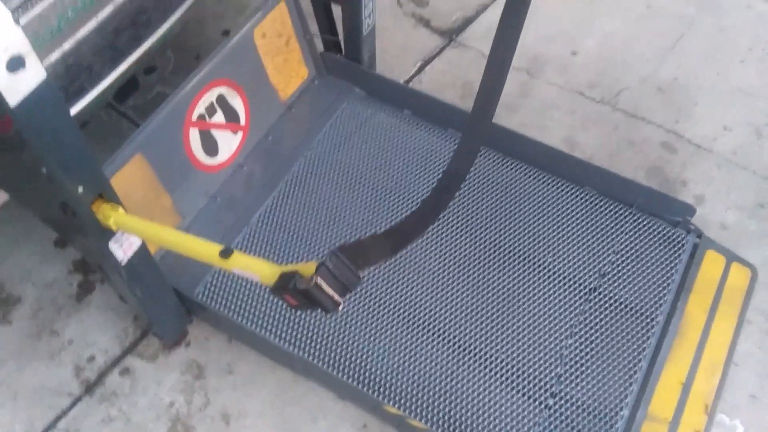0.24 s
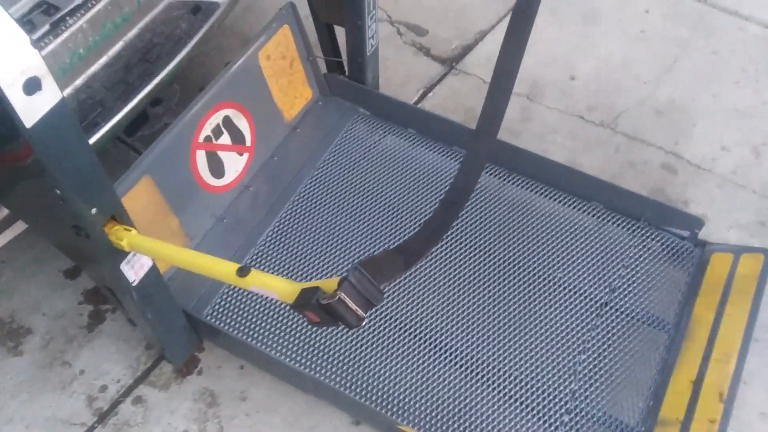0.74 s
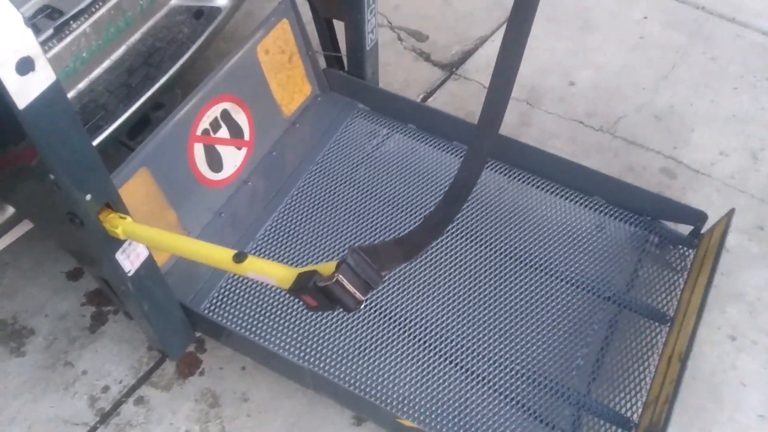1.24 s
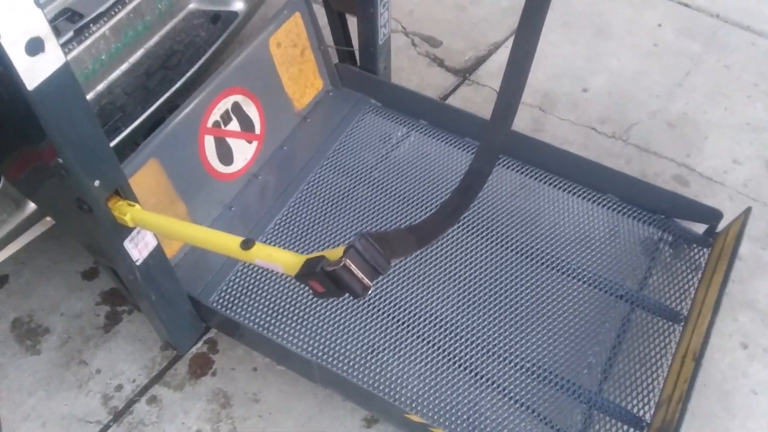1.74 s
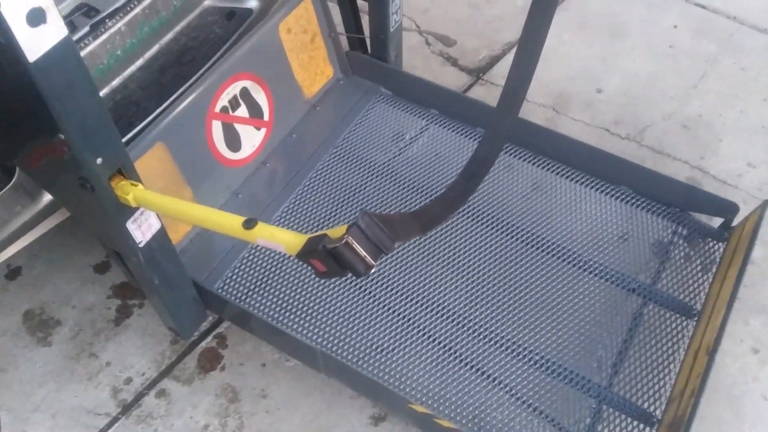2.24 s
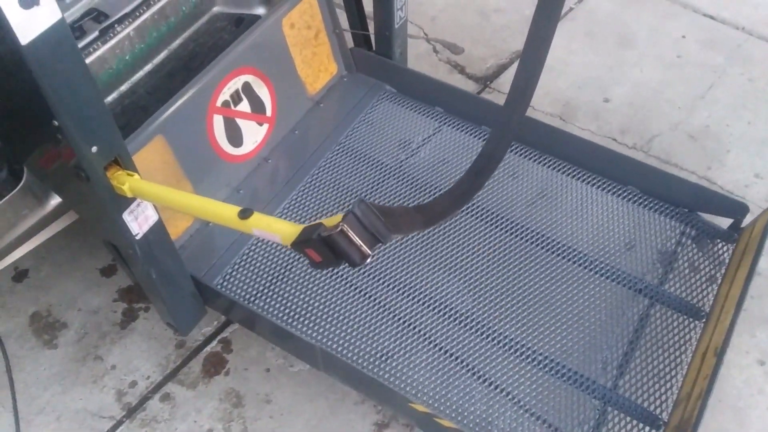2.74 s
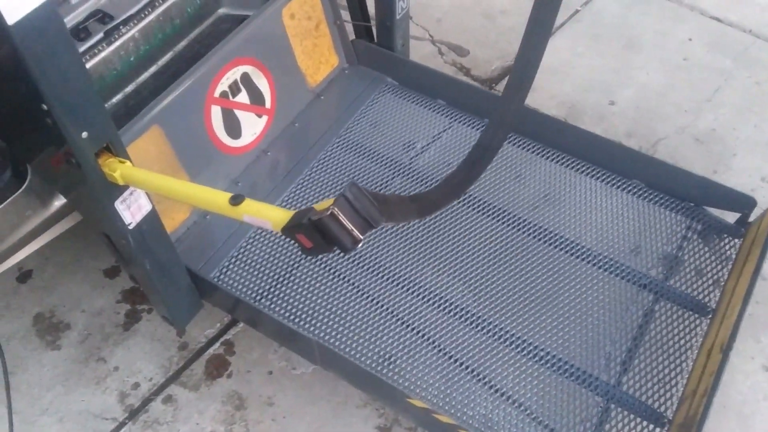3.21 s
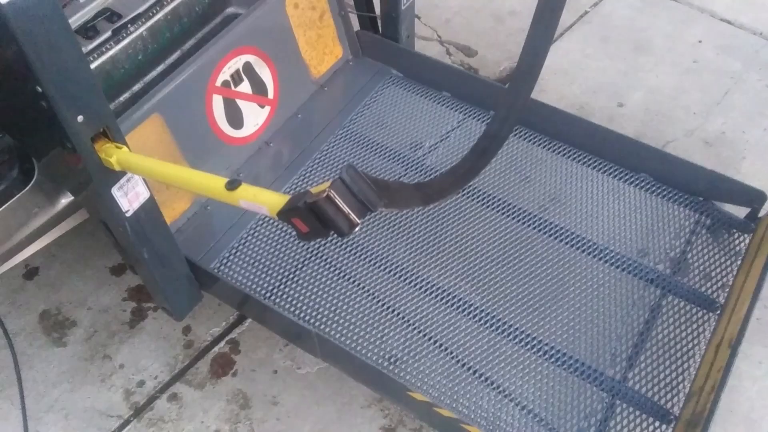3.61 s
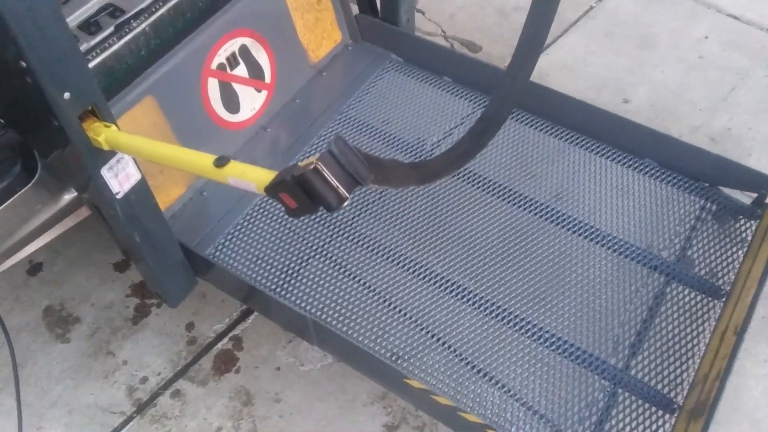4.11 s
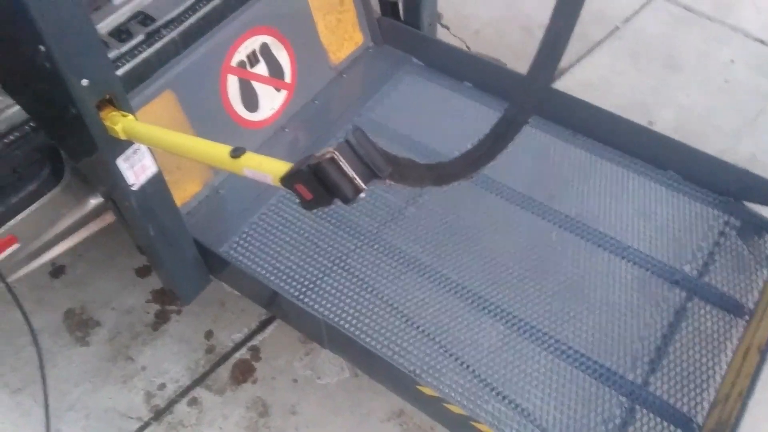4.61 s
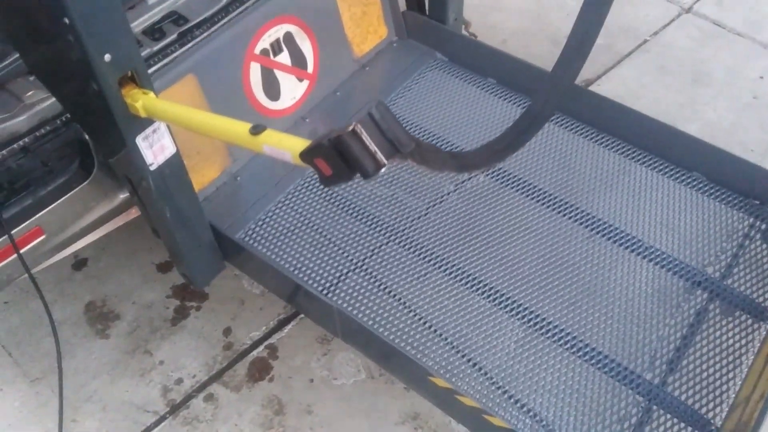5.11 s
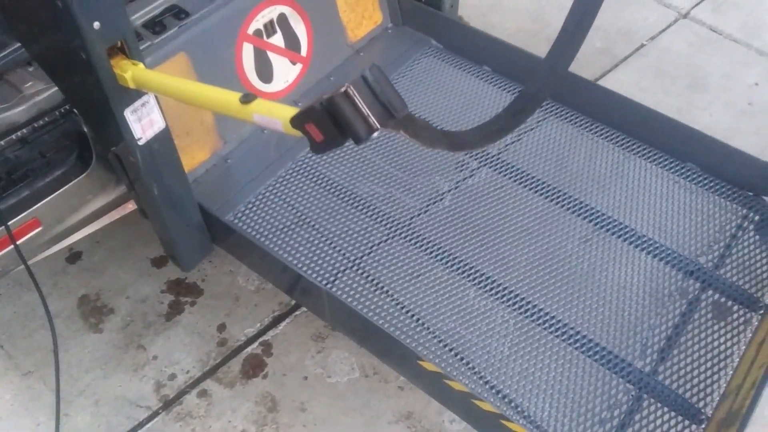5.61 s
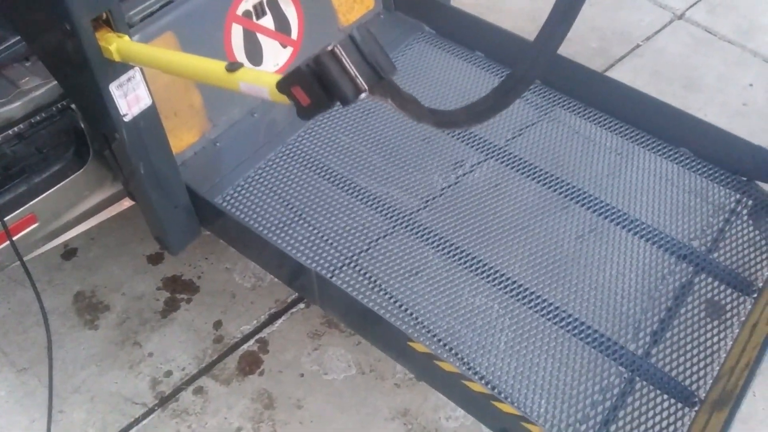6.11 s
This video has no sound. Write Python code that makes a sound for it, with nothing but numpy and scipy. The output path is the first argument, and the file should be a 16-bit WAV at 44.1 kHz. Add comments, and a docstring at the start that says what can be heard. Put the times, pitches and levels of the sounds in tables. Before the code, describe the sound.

An electric motor-driven hydraulic pump whines and hisses steadily close by, with soft thuds early and late and one small metallic tick.

```python
"""A motor-driven pump whines and hisses steadily; soft thuds sound early and late, and a flap ticks once early on.
An electric motor drives the hydraulic pump of a platform lift: its tones are multiples and thirds of shaft speed.
Oil and brushes make shaped noise through the housing, with treble pulsing once and twice a turn.
The hinged steel flap rings short decaying modes as it rises; each thud is a sagging push with a dull puff.
Now and then the hiss and lesser tones drop out briefly, leaving the strongest tones bare."""
import sys
import numpy as np
from scipy import signal
from scipy.fft import rfft, irfft
from scipy.io import wavfile
from scipy.ndimage import uniform_filter1d, minimum_filter1d, map_coordinates

SR = 44100
rng = np.random.default_rng(int(sys.argv[2]) if len(sys.argv) > 2 else 0)


def amplitude_ratio(level_db):
    """Convert a level in decibels to the matching linear amplitude (field) ratio."""
    exponent = np.asarray(level_db, float) / 20
    return 10 ** exponent


def master(y):
    """Save y as 16-bit WAV."""
    cut = np.clip(np.atleast_2d(y).T, -1, 1)
    pcm = np.round(cut * 32767)  # scale
    wavfile.write(sys.argv[1], SR, pcm.astype(np.int16))


N = 280035  # length in samples

# Shaft speed, sagging as the load builds and jumping when it eases: time_s, speed_rev_per_s
SHAFT_SPEED = [(0.0, 89.56), (0.12, 90.33), (0.26, 90.72), (0.39, 90.58), (0.6, 89.55), (0.74, 89.69),
               (1.02, 89.04), (2.07, 88.92), (2.41, 88.48), (3.18, 88.55), (3.67, 88.48), (3.95, 87.97),
               (4.92, 87.84), (4.99, 88.33), (5.41, 87.97), (5.97, 88.09), (6.11, 88.76), (6.35, 89.01)]
# Tones that carry the whine, before trim, swells and flutter: shaft_multiple, start_rms_db, end_rms_db
MAIN_TONES = [(3, -63.2, -54.5), (6, -46.5, -51.3), (7, -48.4, -54.7), (8, -54.1, -47.5), (9, -51.5, -45.2),
              (10, -48.6, -40.3), (12, -57.3, -54.2), (14, -56.6, -44.3), (17, -56.6, -56.8),
              (18, -38.3, -45.0), (18.33, -50.9, -53.9), (20, -68.2, -51.5), (23, -45.3, -57.4),
              (29, -59.0, -51.8), (33, -51.2, -52.4), (34, -47.8, -49.3), (36, -47.1, -58.4),
              (46, -54.2, -53.6), (70, -51.3, -58.7), (71, -55.1, -46.0), (72, -44.9, -43.5),
              (73, -55.0, -45.0), (74, -43.1, -50.5), (107, -58.3, -57.7), (108, -52.4, -48.9),
              (113, -67.3, -57.2), (115, -69.8, -61.3), (130, -66.9, -59.8), (144, -60.2, -61.6)]


def curve(rows, s):
    """Linear interpolation: the second column of a table read at the times s."""
    return np.interp(s, *np.transpose(rows))


def bell(s, mid, spread):
    """Gaussian envelope: a smooth rise and fall around mid."""
    return np.exp(-.5 * ((s - mid) / spread) ** 2)


def drift(shape, smooth):
    """First-order recursive smoothing: chance of rms 1, slowed down the columns."""
    z = signal.lfilter([1], [1, -smooth], rng.standard_normal(shape), axis=0)
    return z / z.std()


def hiss_db(hz):
    """Spectral density in dB per Hz: a broad slope raised by the housing's resonances."""
    # Slope of the hiss ahead of the resonances: frequency_hz, density_db_per_hz
    slope = [(60, -131), (90, -116), (155, -87), (200, -87.5), (265, -78.5), (450, -77), (620, -73.5),
             (1250, -75), (2350, -87), (3700, -85), (4900, -86), (8000, -83.5), (8850, -92), (12300, -95),
             (15600, -94)]
    # Resonances of the housing: centre_hz, width_hz, lift_db
    panels = [(1606, 200, 5), (2970, 600, 8.5), (3980, 350, -0.5), (5390, 470, 6.5), (6490, 990, 8.5),
              (9760, 330, 9)]
    f, db = np.transpose(slope)
    humps = sum(lift_db / (1 + (2 * (hz - centre) / width) ** 2) for centre, width, lift_db in panels)
    return np.interp(np.log(hz + 1), np.log(f + 1), db) + humps


def shaft():
    """Integration of speed to angle in turns, with a small quick unevenness that blurs the high tones."""
    jitter_turns, knots_per_s = .0005, 24
    wobble_rev_per_s, wobble_hz, crest_s, mid_s, spread_s = .125, 2.334, 3.158, 2.71, .95
    s = np.arange(N) / SR
    knots = rng.standard_normal(int(N / SR * knots_per_s) + 4)
    uneven = map_coordinates(knots, [s * knots_per_s])
    # mid-stroke the speed rocks up and down
    rocking = wobble_rev_per_s * bell(s, mid_s, spread_s) * np.cos(2 * np.pi * wobble_hz * (s - crest_s))
    return np.cumsum(curve(SHAFT_SPEED, s) + rocking) / SR + jitter_turns * uneven


def hiss(angle, patchy_db=1.73, once_depth=0.17, twice_depth=0.54):
    """Filtered noise of oil and brushes, in patches, its treble amplitude-modulated by the rotation."""
    # Slow change of the whole hiss: time_s, change_db
    loudness = [(0, 1), (1, 1.5), (2, 1), (3, 1.5), (4, 2), (5, 1.5), (6.35, 1.5)]
    hz, _, z = signal.stft(rng.standard_normal((2, N + SR)), SR, nperseg=1024)
    patches = rng.standard_normal(z.shape[1:])
    for axis in (0, 1):  # smooth over frequency, then time
        patches = uniform_filter1d(patches, 8, axis)
    colour_db = hiss_db(hz)[:, None] + patchy_db * patches / patches.std()
    gain = amplitude_ratio(colour_db) * np.sqrt(SR / 2)  # from level per Hz to white noise of rms 1
    treble = 1 / (1 + (3000 / (hz + 1)) ** 4)  # share of the power that pulses
    split = np.sqrt([1 - treble, treble])[..., None]
    low, high = signal.istft(z * gain * split, SR, nperseg=1024)[1][:, :N]
    once = once_depth * np.cos(2 * np.pi * angle)
    twice = twice_depth * np.cos(4 * np.pi * angle + 1)
    return amplitude_ratio(curve(loudness, np.arange(N) / SR)) * (low + (1 + once + twice) * high)


def bumps(rise_s=0.0022, puff_db=8, puff_span=2.8, sag_per_s=3.1):
    """Damped oscillation: a soft low push sags in pitch under low-passed noise, a dull puff."""
    # Soft thuds, level ahead of rise and puff, pitch at onset: start_s, level_db, pitch_hz, t60_s
    thuds = [(.05, -32, 610, 0.077), (0.081, -41, 640, 0.14), (0.256, -33, 579, 0.18),
             (.335, -40, 620, 0.15), (5.763, -28.5, 250, 0.04), (5.876, -29.5, 410, 0.069),
             (5.918, -23.5, 263, 0.038)]
    out, t = np.zeros(N), np.arange(SR // 4) / SR
    for start, db, hz, t60 in thuds:
        b, a = signal.butter(2, puff_span * hz / (SR / 2))
        puff = signal.lfilter(b, a, rng.standard_normal(len(t)))
        push = np.sin(2 * np.pi * hz * t * np.exp(-sag_per_s * t))
        envelope = amplitude_ratio(db - 60 * t / t60) * (1 - np.exp(-t / rise_s))
        out[round(start * SR):][:len(t)] += envelope * (push + amplitude_ratio(puff_db) * puff)
    return out


def flap(rattle_db=-20, rattle_t60=.25, trim_db=-2):
    """Modal impact: two quick contacts ring the flap's short modes; the mesh plate rattles briefly after."""
    # Contacts of the flap, level ahead of the trim: start_s, level_db
    contacts = [(0.2087, -23), (0.2112, -13.5)]
    # Modes of the flap, level relative to the contact: pitch_hz, level_db, t60_s
    modes = [(1000, -8.5, 0.011), (4860, -11, 0.0067), (6200, -1.5, 0.0066), (8140, -5.5, 0.0064),
             (13000, -9, 0.0024)]
    out, t = np.zeros(N), np.arange(SR // 5) / SR
    b, a = signal.butter(2, [2000 / (SR / 2), 11000 / (SR / 2)], "band")
    for start, db in contacts:
        ring = sum(amplitude_ratio(mode_db - 60 * t / t60) * np.sin(2 * np.pi * hz * t) for hz, mode_db, t60 in modes)
        rattle = signal.lfilter(b, a, rng.standard_normal(len(t)))
        rattle *= amplitude_ratio(rattle_db - 60 * t / rattle_t60)
        out[round(start * SR):][:len(t)] += amplitude_ratio(db + trim_db) * (ring + rattle)
    return out


def tone_db(s):
    """Superposed level changes in dB: each main tone slides straight over the stroke, plus its swells."""
    # Single tones swell or sink for a moment: centre_s, shaft_multiple, change_db, spread_s
    swells = [(0.1, 144, -12.1, 0.12), (0.17, 74, -5.9, 0.26), (0.36, 17, 7.7, 0.28),
              (0.38, 18, -7.7, 0.85), (0.65, 6, -5.0, 0.54), (1.02, 108, -8.1, 0.5), (1.07, 72, 7.0, 0.24),
              (1.4, 36, -7.3, 0.2), (1.4, 113, -11.7, 0.18), (1.75, 46, -8.1, 0.18), (1.75, 115, -7.9, 0.4),
              (1.9, 29, -7.8, 0.26), (2.1, 70, -9.7, 0.18), (2.1, 72, 7.3, 0.38), (2.12, 107, -12.5, 0.9),
              (2.2, 20, 9.3, 0.45), (2.52, 71, 4.6, 0.2), (2.56, 10, 3.3, 0.14), (2.64, 23, -9.6, 0.65),
              (2.66, 8, 4.3, 0.9), (2.77, 34, 6.6, 0.9), (2.83, 72, 4.0, 0.17), (2.95, 7, -5.3, 0.89),
              (3.04, 14, 4.2, 0.9), (3.05, 108, -3.9, 0.18), (3.21, 73, 6.9, 0.51), (3.25, 144, -7.5, 0.4),
              (3.3, 12, 9.0, 0.69), (3.3, 130, -8.2, 0.26), (3.95, 115, -8.9, 0.4), (4.06, 23, 6.1, 0.22),
              (4.15, 113, -5.9, 0.4), (4.18, 73, -7.0, 0.17), (4.26, 34, -4.4, 0.24), (4.27, 70, 8.0, 0.58),
              (4.29, 71, -14.0, 0.57), (4.3, 17, -6.7, 0.4), (4.48, 6, -7.4, 0.52), (4.5, 72, 9.1, 0.35),
              (5.26, 10, 2.5, 0.49), (5.4, 73, 7.1, 0.35), (5.46, 18, -4.3, 0.52), (5.55, 108, -14.0, 0.6),
              (5.91, 36, 10.8, 0.48), (5.95, 74, 4.4, 0.14), (6.05, 113, -8.1, 0.18),
              (6.1, 130, -11.1, 0.12), (6.14, 72, 6.2, 0.33)]
    order, start_db, end_db = np.transpose(MAIN_TONES)
    level_db = start_db + np.outer(s * SR / N, end_db - start_db)
    for mid, which, db, spread in swells:
        level_db += np.outer(db * bell(s, mid, spread), order == which)
    return level_db


def whine(angle, scatter_db=2, drift_db=2.5, trim_db=-0.61, treble_db=5.5, thirds_db=0.5):
    """Fourier synthesis: three turns make one wave of all tones, slowly re-mixed as the shaft reads it out."""
    # Further tones, ahead of the treble lift: shaft_multiple, mean_rms_db
    further = [(2, -72), (4, -70), (5, -57.3), (13, -52.8), (16, -60), (19, -56.8), (21, -62.9),
               (25, -64.9), (28, -63.8), (30, -60.6), (32, -58.0), (37, -56.0), (38, -56.1), (39, -60.8),
               (40, -61.5), (45, -61.7), (47, -61.6), (53, -61.5), (54, -59.9), (57, -57.9), (64, -57.8),
               (66, -55.4), (69, -57.6), (75, -56.1), (76, -53.8), (79, -60.7), (80, -56.2), (90, -58.5),
               (92, -60.9), (93, -63.4), (101, -71.4), (102, -74.4), (103, -69.9), (104, -66.3),
               (106, -66.9), (109, -60.0), (110, -67.9), (111, -68.8), (112, -68.8), (117, -73.6),
               (122, -66.6), (123, -72.2), (124, -69.1), (125, -69.2), (126, -67.7), (127, -70.6),
               (128, -65.8), (129, -66.5), (131, -73.7), (132, -68.8), (133, -70.5), (134, -77.1),
               (135, -69.2), (138, -76.2), (140, -72.4), (141, -75.0), (142, -74.5), (143, -73.2),
               (145, -68.9), (148, -72.0), (149, -69.8), (155, -75.3), (160, -72.1), (165, -75.2),
               (174, -71), (175, -75.7)]
    # Tones of a part geared down three to one, ahead of trim and treble lift: third_multiple, mean_rms_db
    geared = [(22, -61.1), (23, -63.2), (25, -60.1), (26, -62.0), (28, -58.4), (31, -61.6), (32, -62.0),
              (34, -61.8), (35, -63.9), (37, -58.3), (40, -62.7), (41, -61.5), (43, -61.1), (44, -64.3),
              (47, -65.7), (49, -70.5), (50, -62.9), (52, -61.8), (53, -62.0), (58, -65.5), (61, -70.8),
              (62, -73.6), (73, -74.6), (76, -74.2), (79, -78.2), (80, -78.5), (83, -72.9), (88, -71.3)]
    top_order, gear, wave_size, knots_per_s = 176, 3, 16384, 8
    faint_db, geared_db = 16.5, 7  # unlisted multiples and thirds, over the hiss per Hz
    flutter_db, slip_rad = 2, 0.23  # per knot: main tones' level, and the top tone's phase step

    s = np.arange(int(N / SR * knots_per_s) + 2) / knots_per_s
    k = np.arange(gear * top_order + 1)  # counts thirds of shaft speed
    height = k / k[-1]
    mean_db = hiss_db(k / gear * np.mean(SHAFT_SPEED, axis=0)[1])
    mean_db += np.where(k % gear, geared_db, faint_db) + scatter_db * rng.standard_normal(len(k))
    for order, db in further:
        mean_db[gear * round(order)] = db
    for third, db in geared:
        mean_db[round(third)] = db + thirds_db
    # random drift in dB raises the mean power, so it is taken off first
    level_db = mean_db - drift_db ** 2 * np.log(10) / 20 + drift_db * drift((len(s), len(k)), smooth=0.86)
    main = np.round(gear * np.transpose(MAIN_TONES)[0]).astype(int)
    level_db[:, main] = tone_db(s) + trim_db + flutter_db * drift((len(s), len(main)), smooth=0)
    level_db += treble_db * height ** 2  # the top tones are lifted a little

    # phases creep, high tones faster, as the paths to the microphone change
    creep = slip_rad * height ** 0.27 * rng.standard_normal(level_db.shape)
    phase = 2 * np.pi * rng.random(len(k)) + np.cumsum(creep, axis=0)
    waves = irfft(amplitude_ratio(level_db) * np.exp(1j * phase), wave_size) * wave_size / np.sqrt(2)  # rms levels
    waves = np.column_stack([waves, waves[:, 0]])  # close the loop for interpolation
    knot_at = np.arange(N) * knots_per_s / SR
    return map_coordinates(waves, [knot_at, angle / gear % 1 * wave_size], order=1)


def dropouts(x, ramp_s=0.024, left_db=-40, lift_db=1.0):
    """Spectral peak selection: all but the tallest peaks fade to almost nothing and back on a quarter sine."""
    # Brief dropouts of the hiss and lesser tones: centre_s, held_s
    gaps = [(.169, 0), (.319, 0), (.873, 0), (1.236, 0), (1.31, .021), (1.64, 0), (1.726, 0), (2.132, 0),
            (2.196, 0), (2.302, 0), (2.399, .021), (2.58, 0), (2.9, 0), (3.252, .021), (3.422, .021),
            (3.487, .021), (3.646, 0), (3.891, .021), (4.073, 0), (4.116, 0), (4.297, .021), (4.414, 0),
            (4.479, 0), (4.52, 0), (4.563, 0), (4.755, 0), (4.862, 0), (5.097, .043), (5.161, 0),
            (5.247, 0), (5.566, 0), (6.1, 0), (6.164, 0)]
    frame, survivors, hum_hz = 2048, 12, 264  # samples; peaks kept per frame; lowest shaft hum
    favour = .45  # share of the hiss colour discounted when peaks are ranked
    gain, t = np.ones(N), np.arange(N) / SR
    for centre, held in gaps:
        gain *= np.sin(np.pi / 2 * np.clip((abs(t - centre) - held / 2) / ramp_s, 0, 1))

    hz, _, z = signal.stft(x, SR, nperseg=frame)
    height = abs(z) / amplitude_ratio(favour * hiss_db(hz))[:, None]  # favours peaks over a quiet part of the hiss
    local_top = -minimum_filter1d(-height, size=5, axis=0)
    peaks = height * (height >= local_top)
    tall = peaks >= np.sort(peaks, axis=0)[-survivors]
    tall |= (abs(hz - hum_hz) < SR / frame)[:, None]  # the lowest hum always sounds on
    kept = ~minimum_filter1d(~tall, size=5, axis=0)  # take in the skirts of each peak
    bare = signal.istft(z * kept, SR, nperseg=frame)[1][:N]
    # the bare tones are always a little raised, most of all in the gaps
    return np.maximum(gain, amplitude_ratio(left_db)) * (x - bare) + amplitude_ratio(lift_db * (1.5 - gain)) * bare


def scene():
    """Linear superposition: motor, flap and thuds add at one microphone, given alike to both channels."""
    angle = shaft()
    motor = dropouts(whine(angle) + hiss(angle))
    # the knocks carry no deep bass
    high_pass = signal.butter(5, 140 / (SR / 2), "high", output="sos")
    knocks = signal.sosfilt(high_pass, flap() + bumps())
    return np.tile(motor + knocks, (2, 1))


def top_cut(x):
    """Nothing passes above the cut-off."""
    return signal.sosfilt(signal.butter(12, 16780, fs=SR, output="sos"), x)


def record(dry):
    """Band limitation: the camera keeps nothing at or above its upper frequency limit."""
    top_hz = 15730
    kept = irfft(rfft(dry) * (np.fft.rfftfreq(N, 1 / SR) < top_hz), N)
    return top_cut(kept)


dry = scene()
out = record(dry)
master(out)
```